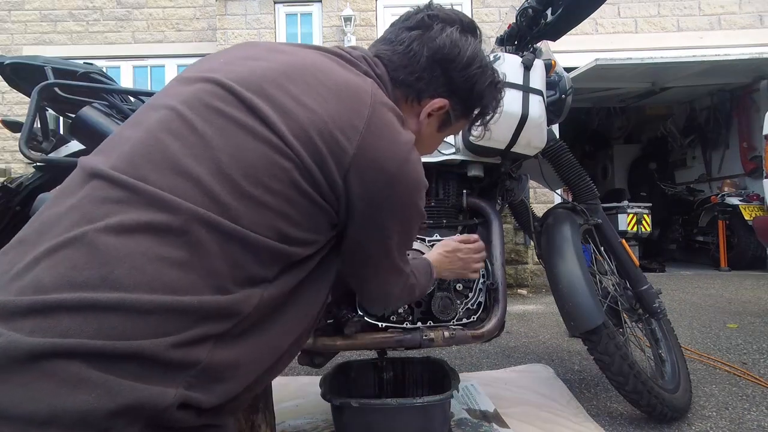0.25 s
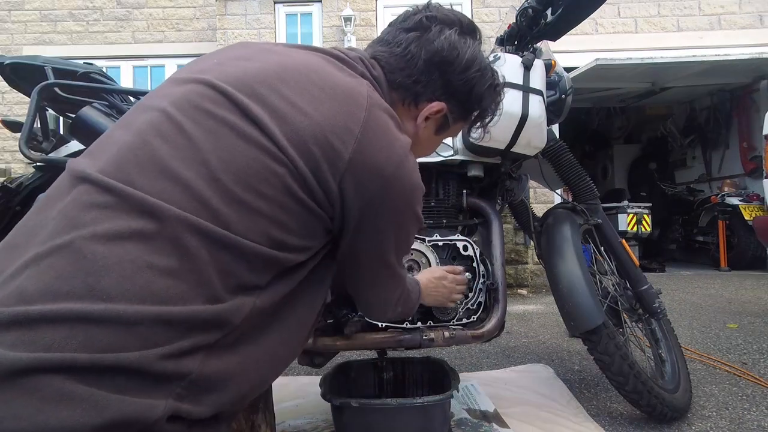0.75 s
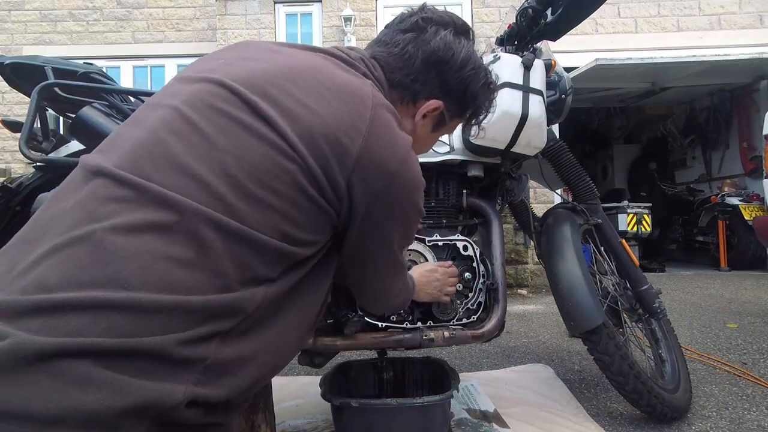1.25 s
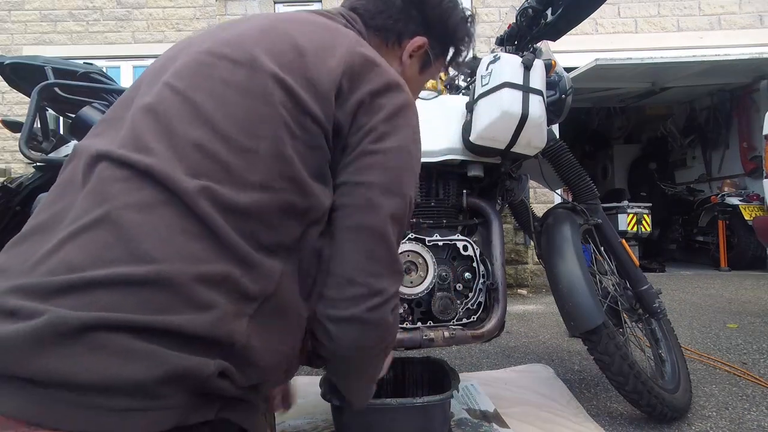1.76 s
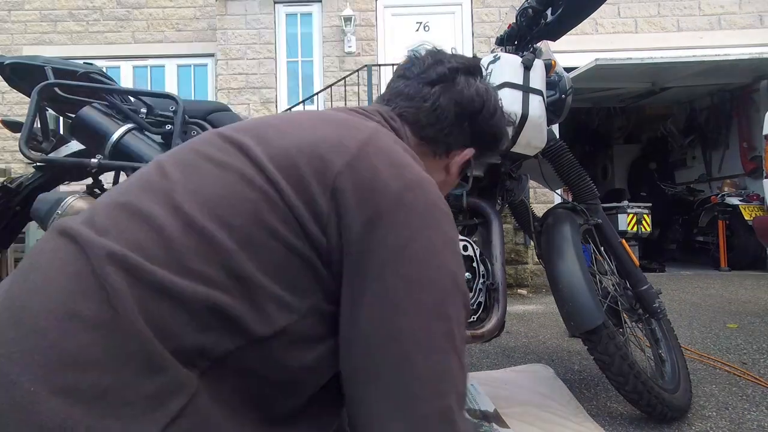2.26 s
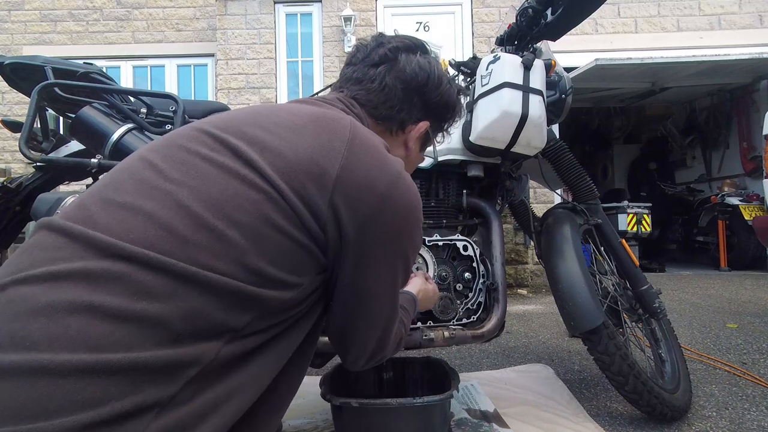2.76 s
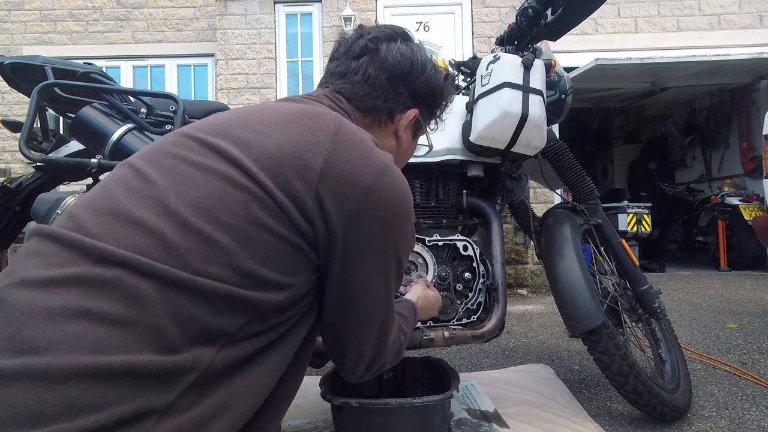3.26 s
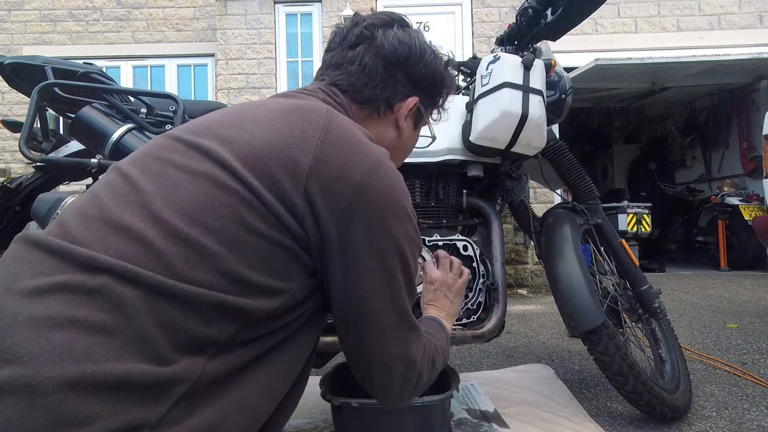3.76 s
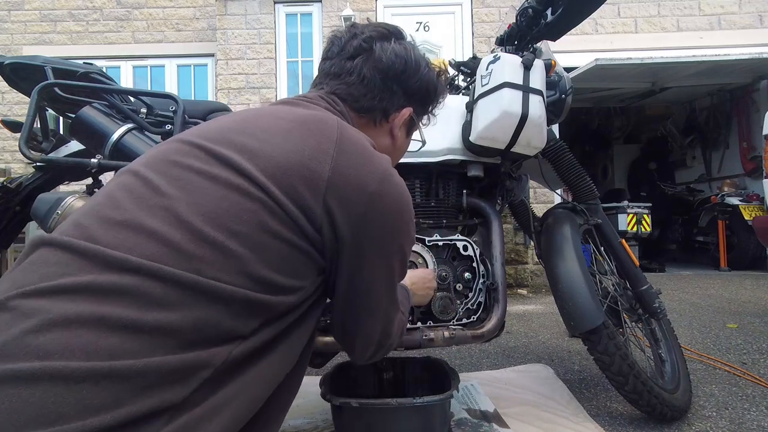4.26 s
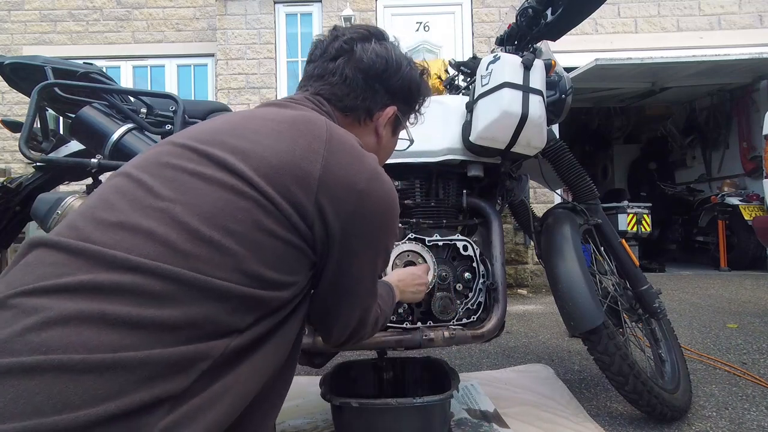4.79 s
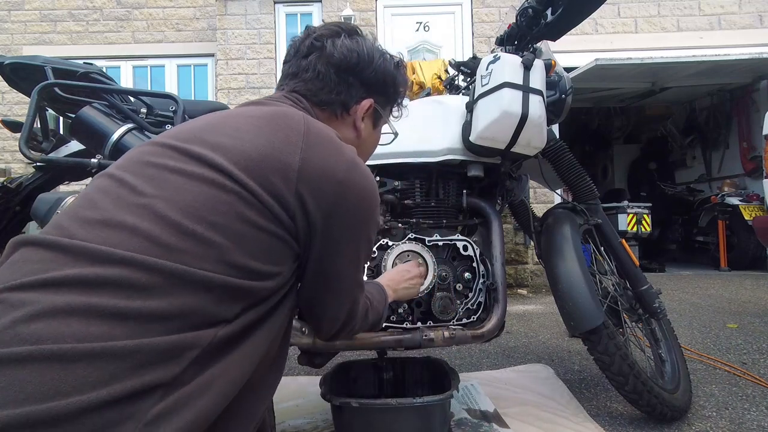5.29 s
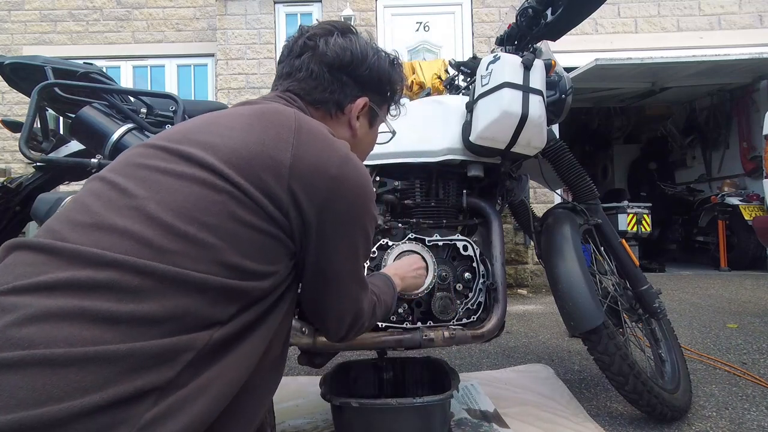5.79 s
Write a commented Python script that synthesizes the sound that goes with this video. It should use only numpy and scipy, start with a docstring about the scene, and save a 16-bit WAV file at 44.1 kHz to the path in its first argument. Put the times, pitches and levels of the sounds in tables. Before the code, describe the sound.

Close up on a driveway, heavy oiled steel plates clack and clatter into a cast engine housing in short bursts, with low thuds, brief scrapes and quick plate rings. After a quiet gap with only faint sleeve rustle and soft outdoor rumble, lighter, scattered metal clicks follow, the brightest near the end, then a faint distant bird.

```python
"""Clutch parts are pushed by hand into the open crankcase of a motorcycle on a driveway, heard close up.
Oiled steel clacks against the basket (noise and damped modes) over low thuds (two low damped modes).
Later, small parts click as the fingers seat them; short scrapes and single plate notes join the contacts.
A faint sleeve rustle of shaped noise and a distant bird of gliding sines sit on outdoor rumble and hiss."""
import sys
import numpy as np
from scipy import signal
from scipy.fft import rfft, irfft, next_fast_len
from scipy.io import wavfile
from scipy.ndimage import map_coordinates

SR = 44100
rng = np.random.default_rng(int(sys.argv[2]) if len(sys.argv) > 2 else 0)


def digitize_waveform(pressure):
    """Quantize a signal to 16-bit integers and store it at the path in sys.argv[1].

    Rows of a 2-D input are taken as channels; values are limited to [-1, 1].
    """
    field = np.atleast_2d(pressure).T
    bounded = np.clip(field, -1, 1)
    quanta = np.round(bounded * 32767).astype(np.int16)
    wavfile.write(sys.argv[1], SR, quanta)


N = 266099

# crowded fast modes of the cast housing: (frequency [Hz], density [dB per Hz])
CASTING_SPECTRUM = [(100, -27.5), (280, -4), (700, -0.5), (1300, 5), (2400, -3), (3400, 0.5), (4100, -14),
                    (5000, -1.5), (6600, -19.5), (8000, -18), (10200, -37), (11500, -58), (15000, -55.5)]
STRIKE_SCATTER_DB = 2  # spread of mode strengths from hit to hit


def amp(db):
    """Decibels to gain."""
    return 10 ** (np.asarray(db) / 20)


def unit(x):
    """Scale to rms 1."""
    return x / np.sqrt(np.mean(x ** 2) + 1e-20)


def burst(x):
    """Scale a hit to the energy of 20 ms at rms 1."""
    return x / np.sqrt(np.sum(x ** 2) / (0.02 * SR) + 1e-20)


def along(points, hz):
    """Interpolate (Hz, value) points on a log frequency axis."""
    f, v = np.transpose(points)
    return np.interp(np.log(hz + 1), np.log(f + 1), v)


def wobble(rate):
    """A smooth random curve over the whole scene, with rate knots a second."""
    knots = rng.standard_normal(int(N * rate / SR) + 4)
    return map_coordinates(knots, [np.arange(N) * rate / SR])


def noise(spectrum, size):
    """Noise of rms 1 with the given colour."""
    m = next_fast_len(size)
    gain = amp(along(spectrum, np.fft.rfftfreq(m, 1 / SR)))
    coloured = irfft(rfft(rng.standard_normal(m)) * gain, m)
    return unit(coloured[:size])


def band(x, lo_hz, hi_hz):
    """Causal band-pass."""
    sos = signal.butter(3, [lo_hz, hi_hz], "band", fs=SR, output="sos")
    return signal.sosfilt(sos, x)


def ring(modes, t, scatter_db, detune=0):
    """Damped modes; each mode's strength and pitch are scattered a little at random from hit to hit."""
    hz, db, t60 = np.transpose(modes)[:, :, None]
    polarity = rng.choice([-1, 1], hz.shape)
    gain = polarity * amp(db + scatter_db * rng.standard_normal(hz.shape))
    hz = hz * (1 + detune * rng.standard_normal(hz.shape))
    return np.sum(gain * amp(-60 * t / t60) * np.sin(2 * np.pi * hz * t), axis=0)


def chatter(x, rise, count):
    """A contact is a quick train of tiny collisions spread over twice the rise time."""
    delays, sizes = rng.random(count), rng.standard_normal(count)
    train = np.bincount((delays * 2 * rise * SR).astype(int), sizes)
    return signal.fftconvolve(x, train)[:len(x)]


def grit(size, depth_db):
    """Uneven gain of a contact that catches and lets go about every millisecond."""
    knots = rng.standard_normal(size // 20)
    position = np.arange(size) / SR * 900  # 900 knots a second
    return amp(depth_db * np.interp(position, np.arange(size // 20), knots))


def add(track, s, x):
    """Mix x into the track at time s."""
    part = track[round(s * SR):][:len(x)]
    part += x[:len(part)]


def outdoors():
    """A low rumble and a distant wash swell and ease together over steady hiss."""
    # shared loudness guide, offset and scaled for each layer: (time [s], level [dB])
    guide = [(0.0, -55.5), (1.46, -53), (1.59, -54.5), (2.43, -53), (3.07, -59), (4.7, -56), (4.82, -55),
             (6.03, -54.5)]
    # low outdoor rumble: (frequency [Hz], density [dB per Hz])
    rumble_spectrum = [(20, -42), (45, -15.5), (70, -24.5), (105, -60), (130, -10), (160, 2), (195, -5),
                       (240, -5.5), (300, -22.5), (450, -41)]
    # wash and hiss: (frequency [Hz], density [dB per Hz])
    air_spectrum = [(200, -5.5), (300, -3.5), (420, -8.5), (600, -11), (1200, -13.5), (2500, -20.5),
                    (3300, -26.5), (4300, -37), (5600, -29.5), (6600, -17), (9500, -18.5), (11500, -25.5),
                    (15300, -29.5)]
    rumble_offset_db, rumble_swing = -2.5, 0.8393  # swing: share of the guide's movement followed
    wash_offset_db, wash_swing = -3, 0.5755
    guide_s, guide_db = np.transpose(guide)
    level_db = np.interp(np.arange(N) / SR, guide_s, guide_db)
    mean_db = level_db.mean()
    swell_db = level_db - mean_db

    rumble_db = mean_db + rumble_offset_db + rumble_swing * swell_db + 1.237 * wobble(8)
    rumble = amp(rumble_db) * noise(rumble_spectrum, N)
    wash_db = mean_db + wash_offset_db + wash_swing * swell_db + 0.6622 * wobble(4.7627)
    wash = amp(wash_db) * unit(band(noise(air_spectrum, N), 204.35, 5331))
    hiss = amp(-67) * unit(band(noise(air_spectrum, N), 4321, 19030))
    return rumble + wash + hiss


def yard(x):
    """House wall and open garage return a short, dull tail: noise whose treble dies first."""
    # decay of the reflections: (frequency [Hz], t60 [s])
    tail_decay = [(150, 0.477), (600, 0.3739), (1500, 0.2261), (5000, 0.1762), (12000, 0.16435)]
    hz, t, z = signal.stft(rng.standard_normal(SR), SR, nperseg=256)
    t60 = along(tail_decay, hz)[:, None]
    tail = signal.istft(z * amp(-60 * t / t60), SR, nperseg=256)[1]
    delayed = np.pad(x, (int(0.02 * SR), 0))
    return signal.fftconvolve(delayed, tail / np.linalg.norm(tail))[:N]


def bird():
    """Thin, ragged downward glides over a weak lower octave, blurred by distance."""
    # calls: (time [s], start pitch before the waver [Hz], level [dB])
    calls = [(5.382, 2750, -64), (5.594, 2708, -58), (5.786, 2480, -62.5), (5.811, 1914, -61),
             (5.889, 2480, -58), (5.932, 2380, -66), (6.006, 2420, -61.5)]
    call_s, fall_share = 0.052, 0.17515  # length [s]; share of the pitch lost by the end
    out = np.zeros(N)
    u = np.linspace(0, 1, int(call_s * SR))
    for s, start_hz, db in calls:
        glide_hz = start_hz * (1 - fall_share * u ** 1.5604)
        hz = glide_hz * (1 + 0.0224 * wobble(428)[:len(u)])
        phase = 2 * np.pi * np.cumsum(hz) / SR
        voice = np.sin(phase) + 0.257 * np.sin(phase / 2)
        add(out, s, amp(db) * np.sin(np.pi * u) * voice)
    return out + 0.3467 * yard(out)


def sleeve():
    """Fleece brushes past as the arm reaches down and back: a light drag with a few quicker strokes."""
    # quicker strokes: (time [s], length [s], peak level before the flutter [dB])
    strokes = [(1.926, 0.0607, -61), (1.97, 0.1022, -71.5), (2.12, 0.1952, -66), (2.36, 0.1486, -65),
               (2.499, 0.2193, -68.5)]
    reach_s, reach_length_s, drag_db = 1.415, 1.7124, -74.5  # the whole reach
    peak_share = 0.681  # a stroke gathers speed for this share of its length, then slows to a stop
    t = np.arange(N) / SR
    reach = np.clip((t - reach_s) / reach_length_s, 0, 1)
    speed = amp(drag_db) * np.sin(np.pi * reach)
    for s, length, db in strokes:
        stroke = np.interp((t - s) / length, [0, peak_share, 1], [0, 1, 0])
        speed = np.hypot(speed, amp(db) * stroke)
    fibres = noise([(800, -31), (2600, 0.0), (4000, -13), (5200, 3.5), (6200, -8), (12000, -17)], N)
    flutter = amp(2.016 * wobble(90))
    return speed * flutter * fibres


def small_parts():
    """Light, hard contacts: a gritty noise crack and short modes that the fingers damp at once."""
    # contacts, before the trims below: (time [s], tap [dB], sparkle [dB], ring share [dB])
    clicks = [(2.412, -62.5, -61, -15), (2.455, -65, -56.5, -17), (4.2402, -45.5, -44.5, -11),
              (4.2612, -54.5, -58, 1.5), (4.3968, -43.5, -59.5, -9), (4.4033, -47, -32.5, -7.5),
              (4.5216, -54.5, -58.5, -12.5), (4.6831, -52, -51.5, -4.5), (4.7375, -55, -57.5, -1.5),
              (5.009, -54.5, -67.5, -7), (5.1159, -43, -49, -0.5), (5.258, -38.5, -29.5, 9),
              (5.2634, -41, -37.5, 12)]
    # small steel parts held in the fingers: (frequency [Hz], level [dB], t60 [s])
    part_modes = [(3297.5, -11.5, 0.05043), (5154.1, -2.5, 0.0315), (5476.7, -5.5, 0.03238),
                  (7240, -27.5, 0.024), (8018, -16, 0.027), (8669, 8.5, 0.02042), (9257.7, 5.5, 0.02976),
                  (10011, -1, 0.03536)]
    # colour of the crack: (frequency [Hz], density [dB per Hz])
    crack_spectrum = [(300, -18.5), (1200, -2.5), (2400, -3), (4000, -18), (5200, -18.5), (6200, -10),
                      (7600, 2.5), (10300, -8.5), (11600, -20), (15000, -10.5)]
    crack_t60_s, tick_offset_db = 0.06042, -4
    part_hz, loose_hz_per_db = 1792.2, 12  # the note lifts as the grip loosens and the part rings more
    out, t = np.zeros(N), np.arange(SR // 5) / SR
    for s, tap_db, sparkle_db, ring_db in clicks:
        tick_db = (tap_db + sparkle_db) / 2 + tick_offset_db
        hz = part_hz + loose_hz_per_db * ring_db
        crack = noise(crack_spectrum, len(t)) * grit(len(t), depth_db=3)
        crack = burst(crack * amp(-60 * t / crack_t60_s))
        free = amp(np.clip(ring_db, -8, 3) + 3.0)  # a loosely held part rings more
        modes = ring(part_modes, t, STRIKE_SCATTER_DB, detune=0.01437)
        steel = crack + free * burst(chatter(modes, rise=0.0012, count=4))

        note = burst(ring([(hz, 0, 0.04)], t, 0))
        tap = burst(burst(band(steel, 1101.8, 3584.4)) + amp(ring_db) * note)
        tick = burst(band(steel, 3757.4, 5577.8))
        sparkle = burst(band(steel, 5599, 12986))
        click = amp(tap_db) * tap + amp(tick_db) * tick + amp(sparkle_db - 5.5) * sparkle
        add(out, s, amp(-6.5) * click)
    return out


def slides():
    """Oiled faces scrape briefly on each other: gritty noise that swells and fades."""
    # scrapes: (time [s], length [s], level before the band-pass [dB])
    scrapes = [(0.086, 0.0138, -47.5), (.52, 0.03186, -68.5), (0.829, 0.06245, -41.5),
               (1.285, 0.02725, -40.5), (4.345, 0.05433, -58), (4.748, 0.06797, -61.5),
               (5.056, 0.03544, -66.5)]
    out = np.zeros(N)
    for s, length, db in scrapes:
        u = np.linspace(0, 1, int(length * SR))
        scrape = unit(noise(CASTING_SPECTRUM, len(u)) * grit(len(u), depth_db=2.0))
        swell = np.sin(np.pi * u ** 1.2903)
        add(out, s, amp(db) * swell * band(scrape, 826, 9407))
    return out


def pings():
    """A plate left free for a moment sings one decaying note, roughened by its contact with the basket."""
    # notes: (time [s], frequency [Hz], level before the attack [dB], t60 [s])
    plate_notes = [(.216, 1626, -38.5, 0.05622), (.851, 7625, -49.5, 0.0972), (.881, 7716, -31, 0.0502),
                   (.941, 4640, -37, 0.0667), (1.3063, 1443, -12.5, 0.0609), (1.352, 5270, -30, 0.05174)]
    attack_s, waver_rad = 0.001684, 0.56  # the note swells quickly and wavers as the plate chatters
    out, t = np.zeros(N), np.arange(SR // 5) / SR
    for s, hz, db, t60 in plate_notes:
        phase = 2 * np.pi * hz * t + waver_rad * wobble(400)[:len(t)]
        attack = 1 - np.exp(-t / attack_s)
        add(out, s, amp(db - 60 * t / t60) * attack * np.sin(phase))
    return out


def shoves():
    """A hard seating blow shoves the casting: one very short damped sine."""
    # blows: (time [s], frequency [Hz], peak before the band-pass [dB], t60 [s])
    blows = [(1.3031, 1038, -6, 0.00626)]
    out, t = np.zeros(N), np.arange(SR // 3) / SR
    for s, hz, db, t60 in blows:
        push = amp(db - 60 * t / t60) * np.sin(2 * np.pi * hz * t)
        add(out, s, band(push, 272.5, 6000))  # the casting is too small to radiate deep bass
    return out


def clutch():
    """Steel meets the basket: dense casting modes, the plate's own note, and a low boom."""
    # heavy contacts: (time [s], clack [dB], thud [dB], click [dB], plate note [Hz], rise [s])
    clacks = [(.0946, -24, -38.5, -34, 1513, .0024), (.0987, -27.5, -48, -31, 1699, .0019),
              (.214, -49.5, -59.5, -64, 1635, .0015), (0.3834, -28, -52, -38.5, 2083, .0024),
              (.395, -37, -52, -52, 1982, .0015), (0.428, -47, -49, -61, 1606, 0.002182),
              (0.4483, -33.5, -51, -43.5, 1323, .001), (.806, -34.5, -35, -47.5, 703.3, .001),
              (.823, -32, -38.5, -39.5, 1799, 0.0007991), (.839, -38, -42, -45, 1585, 0.000848),
              (.849, -31.5, -41.5, -40, 2110, 0.0041), (0.8793, -24, -32.5, -37, 1164, 0.0021),
              (0.8964, -23, -40, -24.5, 1757, .0015), (.904, -31.5, -35.5, -39, 1648, .0008),
              (.938, -37, -46.5, -43, 2128, 0.0023), (1.259, -59.5, -43.5, -69, 1188, .0012),
              (1.3031, -22, -31, -26.5, 1283, 0.0004601), (1.3502, -27.5, -28, -35.5, 1487, .0016)]
    # clutch basket and plates: (frequency [Hz], level [dB], t60 [s])
    basket_modes = [(646.64, -2.5, 0.05476), (808.5, -17, 0.0732), (1133.2, -2, 0.097),
                    (1147.5, -1.5, 0.0828), (1478.5, -3, 0.0999), (1591.2, 2.5, 0.02224),
                    (1682.8, 6.5, 0.05408), (2185.5, -3.5, 0.1254), (2461.3, -4, 0.07735),
                    (2917.7, -7, .05), (3355.1, -10.5, 0.0735), (4049, -8.5, 0.02705),
                    (4776.3, 0.5, 0.03124), (5103.7, -2, 0.03104), (5341.5, -42, 0.0721),
                    (6262.8, -3.5, 0.03224), (7202, -19, .05), (7817.7, -11.5, 0.05517),
                    (9875, -18.5, 0.04773)]
    # low boom under the contacts: (frequency [Hz], level [dB], t60 [s])
    boom_modes = [(163.79, -1.5, 0.14412), (196.9, -3.5, 0.1557)]
    # faint lingering ring of the frame: (frequency [Hz], level [dB], t60 [s])
    frame_modes = [(443.7, 2, .8), (422.06, 14.5, .6), (563.27, 7, 0.6967), (585.35, -1.5, 1.031),
                   (651.95, -5, 0.76), (833.16, 1.5, 0.623), (912.9, 10, 0.91), (924.83, -6.5, 2.454),
                   (1122.7, -8, 1)]
    casting_t60_s, note_t60_s, note_share_db = 0.05906, 0.03673, -6
    knock_offset_db = 0.2182  # the knock lies about midway between clack and thud
    boom_rise_s = 0.00604  # the boom swells in slightly late
    out, t = np.zeros(N), np.arange(SR // 3) / SR
    slow_t = np.arange(SR) / SR
    for s, clack_db, thud_db, click_db, hz, rise in clacks:
        knock_db = (clack_db + thud_db) / 2 + knock_offset_db
        attack = 1 - np.exp(-(t / rise) ** 2)
        casting = noise(CASTING_SPECTRUM, len(t)) * grit(len(t), depth_db=0.5)
        casting = burst(casting * attack * amp(-60 * t / casting_t60_s))
        modes = ring(basket_modes, t, STRIKE_SCATTER_DB, detune=0.01468)
        basket = burst(chatter(modes, rise, count=8))
        steel = casting + amp(-3.0) * basket

        note = burst(attack * ring([(hz, 0, note_t60_s)], t, 0))
        clack = burst(burst(band(steel, 839.58, 4151.1)) + amp(note_share_db) * note)
        knock = burst(band(steel, 206.56, 1115.5))
        click = burst(band(steel, 3402.6, 13244))
        boom = ring(boom_modes, t, STRIKE_SCATTER_DB, detune=0.019465)
        boom = burst(band(boom * (1 - np.exp(-t / boom_rise_s)), 138.3, 262.9))
        hit = amp(knock_db) * knock + amp(clack_db) * clack + amp(click_db) * click
        add(out, s, hit + amp(thud_db) * boom)

        frame = ring(frame_modes, slow_t, STRIKE_SCATTER_DB, detune=0.006024)
        add(out, s, amp(thud_db - 30.5) * frame)
    return out


def scene():
    """Metalwork close by, in the open air."""
    heavy = clutch() + shoves() + pings() + slides()
    light = small_parts()
    echo = yard(amp(-19) * heavy + amp(-20) * light)
    return (heavy + light + echo + sleeve() + bird() + outdoors())[None]


def record(dry):
    """A steep low-pass keeps nothing above 15350 Hz."""
    m = next_fast_len(N + SR // 2)
    keep = np.fft.rfftfreq(m, 1 / SR) < 15350
    return irfft(rfft(dry, m) * keep, m)[..., :N]


dry = scene()
out = record(dry)
digitize_waveform(out)
```